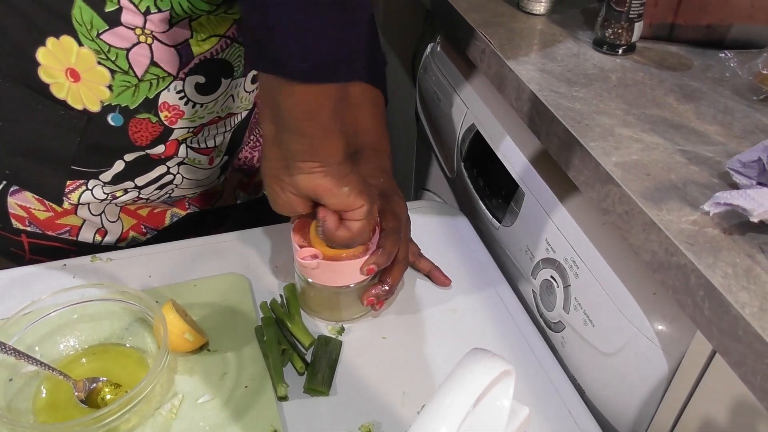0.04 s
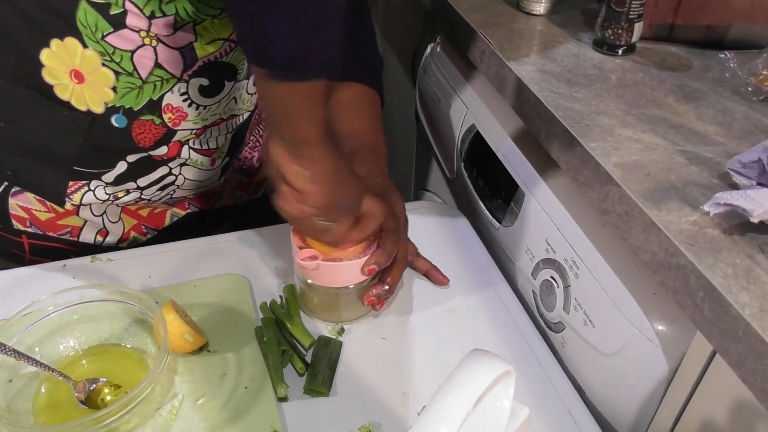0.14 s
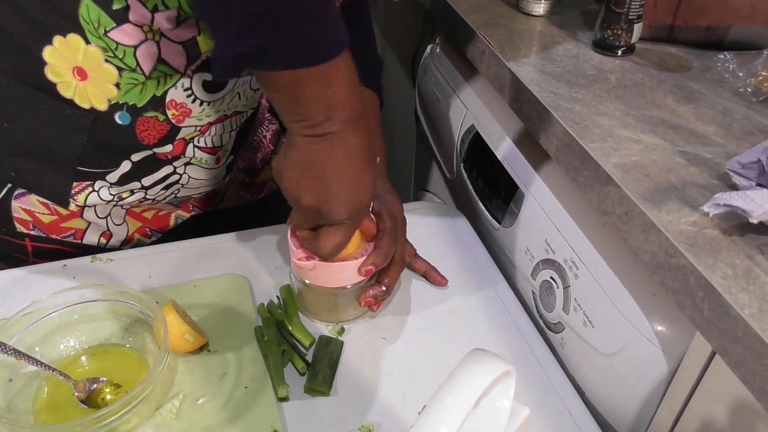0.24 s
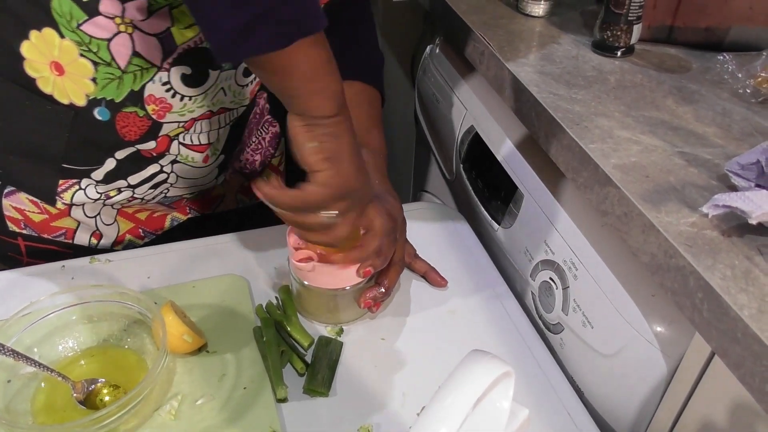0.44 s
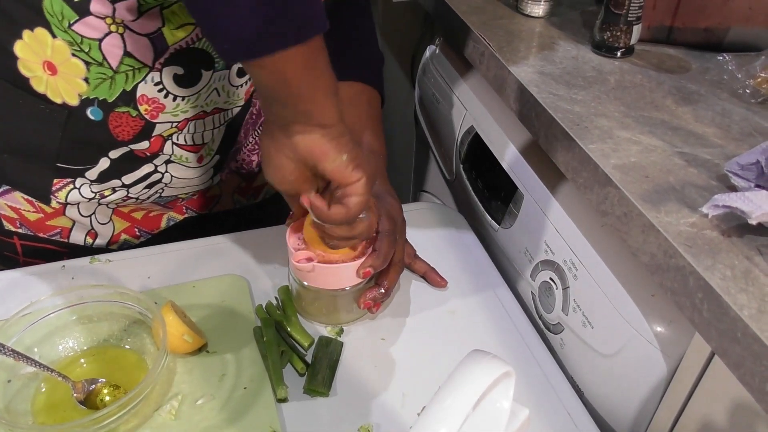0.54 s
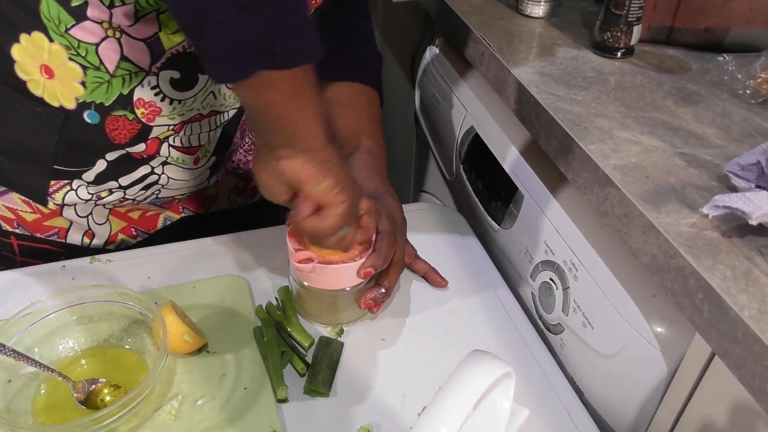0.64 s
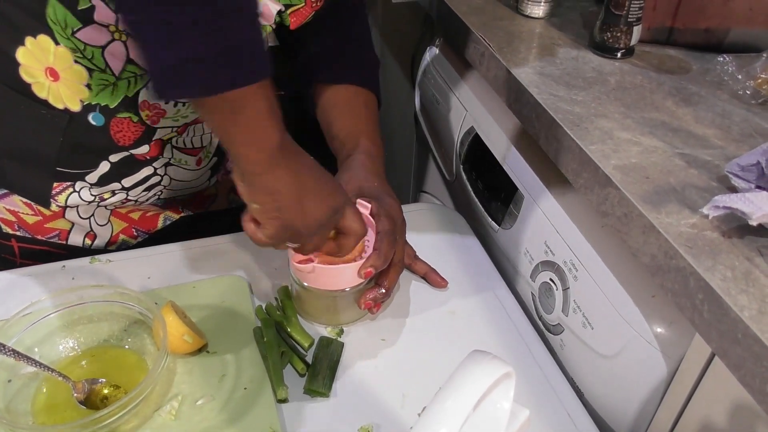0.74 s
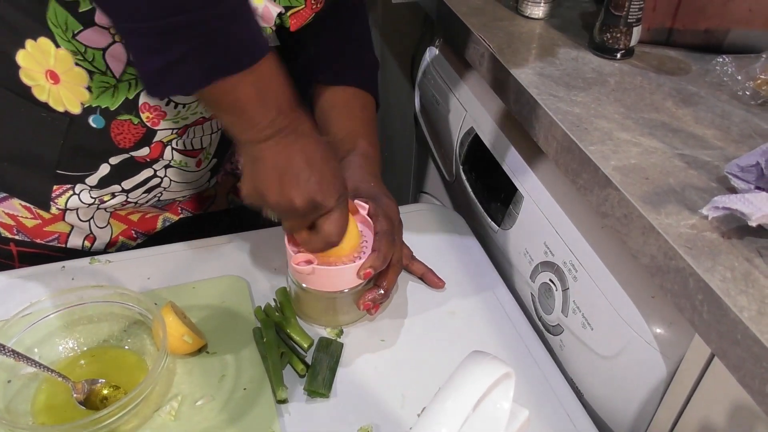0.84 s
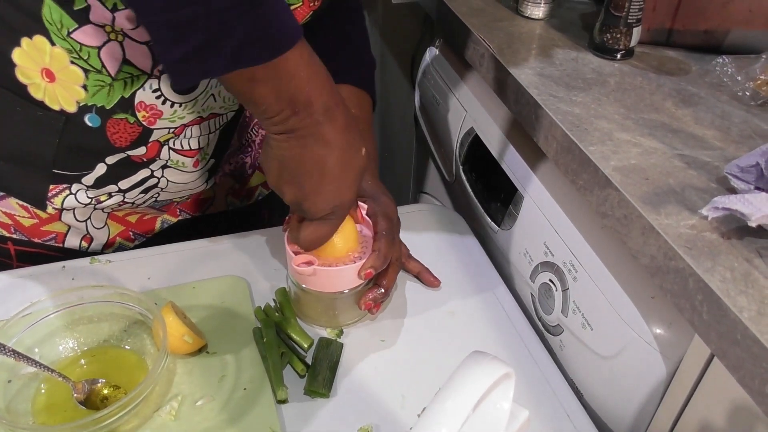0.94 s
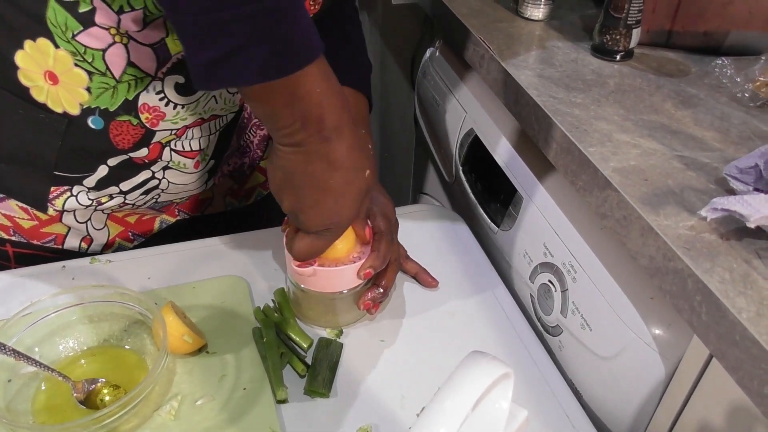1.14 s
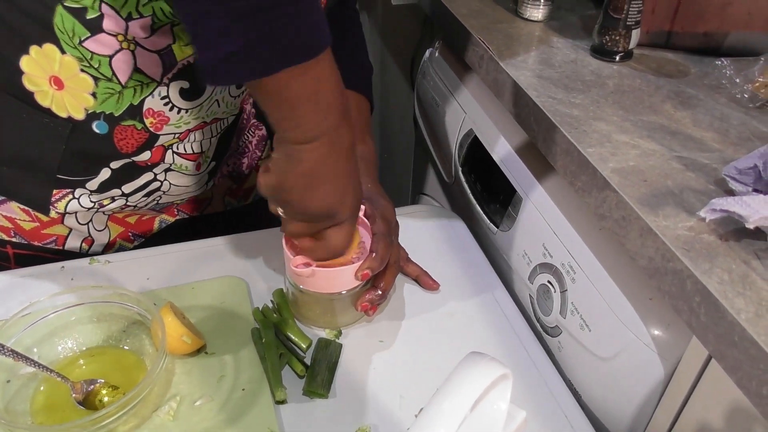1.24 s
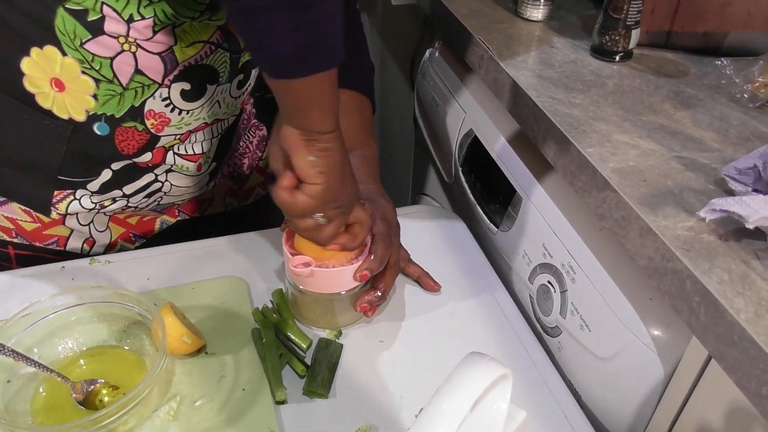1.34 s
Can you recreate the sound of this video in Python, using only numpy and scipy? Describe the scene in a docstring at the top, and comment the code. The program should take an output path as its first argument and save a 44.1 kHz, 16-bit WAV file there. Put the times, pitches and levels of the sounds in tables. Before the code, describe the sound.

A lemon half squelches on a plastic hand juicer, with one sharp crunching snap.

```python
"""A lemon half is pressed and twisted on a plastic hand juicer on a hollow metal appliance top.
Pulp crackles wetly from the start; the rubbing rind makes the top rumble. Near 0.25 s the rind groans,
the reamer slips and snaps twice against its cup, juice sprays and the cup knocks hard on the top.
Lighter knocks, pops and spurts follow; the cup rings near 0.85 s. From 1.25 s the rind groans again.
A small kitchen answers throughout."""
import sys
import numpy as np
from scipy import signal
from scipy.fft import rfft, irfft, next_fast_len
from scipy.io import wavfile
from scipy.ndimage import map_coordinates

SR = 44100
rng = np.random.default_rng(int(sys.argv[2]) if len(sys.argv) > 2 else 0)


def put_to_file(sound):
    """Save the sound as 16-bit audio at rate SR, in the file named by the first command-line argument."""
    columns = np.atleast_2d(sound).T  # one column per channel
    safe = np.clip(columns, -1, 1)
    whole_steps = np.round(safe * 32767)
    wavfile.write(sys.argv[1], SR, whole_steps.astype(np.int16))


N = 61739

# Noise in the top, rubbed or struck: freq_hz, gain_db
TOP_NOISE_SPECTRUM = [(25, -3), (45, -4), (72, -17), (100, -5.5), (122, 5.5), (150, -5.5), (195, 1.5),
                      (255, -5.5), (310, 0.5), (370, -15), (450, -0.5), (520, -9.5), (590, -10.5),
                      (720, -13), (1100, -36), (1800, -44), (4000, -58)]


def snaps(slips):
    """The reamer hits its cup, plastic on plastic: a wet crack and a short bright ring."""
    # freq_hz, level_db, base_t60_s
    reamer_modes = [(3320, -29, .05), (5650, -28, .012), (6380, -17, .01), (7080, -3, .012),
                    (7480, -11, .007), (8150, -8, .012), (9330, -15, .012), (11050, -17, .01),
                    (11950, -17, .01)]
    # freq_hz, gain_db
    crack_spectrum = [(500, -22), (1600, -19), (2400, -16), (4000, -14), (5100, -16), (6200, -7), (7200, 0),
                      (8500, -1), (10000, -8), (11700, -8), (13300, -19), (16000, -22)]
    rise_s, crack_base_t60_s = .00015, .009
    out, t = np.zeros(N), np.arange(SR // 10) / SR
    for start_s, level_db, pitch_ratio, t60_ratio in slips:
        crack = shaped(rng.standard_normal(len(t)), crack_spectrum)
        crack *= amp(-4 - 60 * t / (crack_base_t60_s * t60_ratio))
        modes = [(hz * pitch_ratio, db, t60_s * t60_ratio) for hz, db, t60_s in reamer_modes]
        attack = 1 - np.exp(-t / rise_s)
        add(out, start_s, amp(level_db - 4) * (ring(modes, t, scatter_db=1) + crack) * attack)
    return out


def knocks():
    """A square knock booms in the top; a rim knock rings the cup, damped by the grip."""
    # start_s, top_db, cup_db, cup_t60_ratio
    hits = [(.052, -37, -36, 1), (.064, -56, -35, 0.7), (0.1, -33.5, -46, 0.5), (0.222, -33.5, -52, 0.7),
            (0.24, -37, -46, 0.5), (.2585, -15, -18, 0.9), (.308, -29, -40, 0.7), (.383, -35.5, -55, .6),
            (.517, -37.5, -38, 0.87), (0.597, -39.5, -59, .6), (0.631, -39, -46, 0.8),
            (.7315, -63, -31, 0.36), (.765, -37.5, -48, 0.2), (0.822, -34.5, -52, .5),
            (.8462, -46, -22.5, 0.68), (0.868, -37, -28.5, 0.45), (.9066, -46, -31.5, 0.72),
            (1.129, -42, -41.5, 0.54), (1.165, -39.5, -61, 0.5), (1.284, -37, -41, 0.6),
            (1.339, -39, -46, 0.5), (1.39, -37.5, -56, .6)]
    # freq_hz, level_db, t60_s (cup ungripped)
    top_modes = [(43, -17, .28), (128, -6, .22), (170, -1, .1), (195, 2, .045), (240, -7, .035),
                 (325, -18, .1)]
    cup_modes = [(410, -3, .05), (454, -10, .12), (530, -3, .15), (600, -12, .035), (670, -9, .07),
                 (770, -12, .04), (1050, -24, .02)]
    # freq_hz, gain_db
    top_radiation = [(20, -18), (43, -4), (75, -13), (125, -3), (180, 1), (300, 0)]
    cup_radiation = [(100, -8.5), (400, -1.5)]
    out, t = np.zeros(N), np.arange(SR // 2) / SR
    for start_s, top_db, cup_db, cup_t60_ratio in hits:
        gripped = [(hz, db, t60_s * cup_t60_ratio) for hz, db, t60_s in cup_modes]
        cup = colour(struck(gripped, t, contact_s=.0011), lambda hz: along(cup_radiation, hz))
        top = colour(struck(top_modes, t, contact_s=.002), lambda hz: along(top_radiation, hz))
        add(out, start_s, amp(top_db - 4.5) * top + amp(cup_db - 4) * cup)
    return out


def struck(modes, t, contact_s, thud_t60_s=.06):
    """A body's ring and a dull thud, softened by the contact time."""
    push = np.sin(np.pi * np.minimum(t / contact_s, 1)) ** 2
    thud = amp(-14 - 60 * t / thud_t60_s) * shaped(rng.standard_normal(len(t)), TOP_NOISE_SPECTRUM)
    return signal.fftconvolve(ring(modes, t, scatter_db=2) + thud, push / push.sum())[:len(t)]


def ring(modes, t, scatter_db):
    """Damped modes start together; their levels vary per strike."""
    return sum(amp(db + scatter_db * rng.standard_normal() - 60 * t / t60_s) * np.sin(2 * np.pi * hz * t)
               for hz, db, t60_s in modes)


def pulp():
    """Pulp ground on the ribs: bright fizz and lower squelch, in clumps."""
    # One list per twist: time_s, fizz_db, squelch_db
    twists = [
        [(0.0, -37, -49), (0.026, -44.5, -60), (0.056, -49, -59.5), (0.098, -53, -61), (0.12, -57, -65.5),
         (0.145, -61.5, -60), (0.198, -38.5, -51), (0.215, -44, -50.5)],
        [(0.33, -56, -63), (0.348, -50.5, -60), (0.428, -50, -55.5), (0.566, -62, -67.5), (0.6, -56, -61),
         (0.628, -58, -65.5), (0.646, -52, -56), (0.7, -55, -64)],
        [(0.71, -52, -63), (0.756, -49.5, -56.5), (0.906, -53, -59.5), (1.028, -58.5, -68.5),
         (1.04, -55.5, -59.5), (1.088, -64.5, -73), (1.15, -56, -61.5), (1.19, -60, -76)],
        [(1.2, -63.5, -68), (1.238, -42.5, -53), (1.256, -57, -58), (1.264, -47.5, -66), (1.336, -38, -50),
         (1.354, -52, -62.5), (1.382, -40.5, -52), (1.39, -62, -64)],
    ]
    # freq_hz, gain_db
    fizz_spectrum = [(3000, -17.5), (5200, -10), (6300, -3), (7200, 0), (8600, -0.5), (10000, -6),
                     (11200, -8.5), (13000, -12.5), (16000, -22)]
    squelch_spectrum = [(600, 0.5), (1200, -8), (1600, -11), (2300, 0), (2900, -4), (3600, 1), (4400, -3),
                        (5200, -11.5), (8000, -13), (16000, -30)]
    fizz_db, squelch_db = curves(np.vstack(twists))
    clumps = wobble(120)
    fizz = amp(fizz_db - 5 + 2 * clumps) * crackle(fizz_spectrum, hiss_db=-7.5)
    squelch = amp(squelch_db + 1 + 3 * clumps) * crackle(squelch_spectrum, hiss_db=-6)
    return fizz + squelch


def crackle(spectrum, hiss_db, cells_per_s=2600, spread_db=5.5):
    """Tiny cells tear over a smooth wet hiss; rms 1."""
    sizes = amp(spread_db * np.minimum(rng.exponential(size=N), 3))
    cells = (rng.random(N) < cells_per_s / SR) * sizes * rng.choice([-1, 1], N)
    return shaped(unit(cells) + amp(hiss_db) * rng.standard_normal(N), spectrum)


def pops(t60_s=.012):
    """Larger juice cells and pips pop, each a brief wet tick."""
    # start_s, level_db, tilt_db_per_octave
    bursts = [(0.015, -47, 15), (0.052, -23, 2.5), (.066, -35, 18), (0.198, -41, 19), (0.2071, -23, 2),
              (0.2188, -27, 8), (0.388, -24.5, 0), (0.419, -24, 10), (0.4225, -25.5, 0), (0.449, -31, 15),
              (0.596, -33.5, 25), (0.65, -33.5, -4), (.743, -30, 16), (0.8248, -26.5, -10),
              (0.8471, -32.5, -6.5), (.849, -28, 33), (0.871, -33, 19), (0.908, -35.5, 1),
              (0.9755, -34.5, 29), (1.332, -27.5, -3), (1.381, -52, 13)]
    # freq_hz, gain_db
    spectrum = [(500, -25.5), (1600, -9.5), (2400, -1), (3800, -1), (5200, -9.5), (7200, 9), (8600, 4),
                (10000, -4.5), (11500, -10), (13500, -33), (16000, -57)]
    out, t = np.zeros(N), np.arange(SR // 20) / SR
    for start_s, level_db, tilt in bursts:
        burst = rng.standard_normal(len(t)) * amp(-60 * t / t60_s)
        tick = colour(burst, lambda hz: along(spectrum, hz) + tilt * np.log2(np.maximum(hz, 1000) / 6000))
        add(out, start_s, amp(level_db + 8) * tick / np.linalg.norm(tick))
    return out


def spurts(sharpness=9.5, rise_s=.00055):
    """A squirt of juice and air sounds the resonance of its pocket in the pulp."""
    # start_s, level_db, pocket_hz, length_s
    squirts = [(.296, -33.5, 7300, .007), (.296, -44, 2840, 0.0078), (.397, -44, 3180, 0.0056),
               (.419, -40.5, 2870, .007), (.637, -53, 2240, 0.0073), (.666, -52, 2260, .0084),
               (.7425, -45.5, 2320, 0.0035), (.761, -44, 2350, 0.0066), (.762, -47.5, 3800, 0.0062),
               (.813, -57, 2970, 0.0046), (.8245, -37, 2200, 0.001), (.8445, -39.5, 1460, 0.0026),
               (.916, -62, 2480, 0.013), (.898, -53, 3400, 0.0035), (.909, -45.5, 3580, 0.0034),
               (1.036, -62, 3800, 0.04), (1.248, -36, 7740, 0.0073)]
    out, t = np.zeros(N), np.arange(SR // 10) / SR
    for start_s, level_db, pocket_hz, length_s in squirts:
        noise = rng.standard_normal(len(t))
        jet = colour(noise, lambda hz: -20 * np.log10(1 + (sharpness * np.log((hz + 1) / pocket_hz)) ** 2))
        envelope = (1 - np.exp(-t / rise_s)) * np.exp(-(t / length_s) ** 2)
        add(out, start_s, amp(level_db) * unit(jet) * envelope)
    return out


def spray(slips, t60_s=.28):
    """Each snap flings out juice: a wet fizz that dies away."""
    # freq_hz, gain_db
    spectrum = [(1500, -26), (2600, -24), (3600, -9.5), (5100, -14), (6300, -6.5), (7300, 2.5),
                (8600, -11.5), (10000, -9), (12000, -33), (16000, -36)]
    out, t = np.zeros(N), np.arange(N) / SR
    for start_s, level_db, *_ in slips:
        add(out, start_s, amp(level_db - 32.5 - 60 * t / t60_s) * crackle(spectrum, hiss_db=-7.5))
    return out


def groans(jitter=.06, rough_db=3, overtone_db=-22, fade_s=.008):
    """The rind sticks and slips on the plastic: a rough note that rises as the twist tightens."""
    # One list per twist: time_s, pitch_hz, level_db
    twists = [
        [(.205, 426.3, -59), (.232, 428.5, -38.5), (.243, 450, -35.5), (.254, 486, -40)],
        [(1.255, 470.4, -68), (1.288, 455, -39), (1.315, 461, -56), (1.338, 487, -46), (1.375, 499.6, -58),
         (1.397, 504, -39)],
    ]
    out, t = np.zeros(N), np.arange(N) / SR
    for twist in twists:
        pitch_hz, level_db = curves(twist)
        phase = 2 * np.pi * np.cumsum(pitch_hz * (1 + jitter * wobble(250))) / SR
        tone = np.sin(phase) + amp(overtone_db) * np.sin(2 * phase)
        start_s, end_s = twist[0][0], twist[-1][0]
        gate = np.clip(1 + np.minimum(t - start_s, end_s - t) / fade_s, 0, 1)
        out += gate * amp(level_db) * unit(amp(rough_db * wobble(150)) * tone)
    return out


def rubbing():
    """The rind judders over the ribs and shakes the top."""
    # One list per stretch: time_s, level_db
    stretches = [
        [(0.01, -35.5), (0.112, -48), (0.144, -57), (0.178, -45.5), (0.196, -58), (0.214, -40), (0.27, -36)],
        [(0.35, -46), (0.47, -46.5), (0.564, -52.5), (0.655, -50), (0.715, -53), (0.765, -44), (0.8, -46.5)],
        [(0.93, -46), (1.0, -57.5), (1.1, -60.5), (1.135, -49), (1.22, -53.5), (1.276, -44), (1.39, -51.5)],
    ]
    level_db, = curves(np.vstack(stretches))
    judder = shaped(rng.standard_normal(N) * amp(1.13 * wobble(90)), TOP_NOISE_SPECTRUM)
    return amp(level_db + .5) * judder


def room(x, wet_db):
    """Direct sound plus the kitchen's tail."""
    # freq_hz, t60_s
    decay = [(150, 0.19), (1000, 0.33), (7000, 0.14), (15000, 0.1)]
    hz, t, noise = signal.stft(rng.standard_normal((2, SR // 2)), SR, nperseg=256)
    tail = signal.istft(noise * amp(-60 * t / along(decay, hz)[:, None]), SR, nperseg=256)[1]
    tail[:, :SR // 400] = 0  # 2.5 ms pre-delay
    wet = signal.fftconvolve(x[None], tail / np.linalg.norm(tail[0]), axes=1)[:, :N]
    return x + amp(wet_db) * stereo(*wet)


def room_noise(level_db=-54):
    """Quiet, steady, mostly low noise."""
    # freq_hz, gain_db
    spectrum = [(25, -5), (70, -7), (130, 4.5), (500, -0.5), (800, -5), (1200, -10.5), (1700, -23),
                (2500, -20.5), (4000, -21), (5300, -35), (7200, -19), (11000, -30.5), (16000, -29)]
    return amp(level_db) * stereo(*shaped(rng.standard_normal((2, N)), spectrum))


def stereo(mid, side):
    """Left and right; the stereo image is narrow at 2.5-6.5 kHz and wide above 10 kHz."""
    # freq_hz, gain_db
    side_spectrum = [(100, -14), (500, -9.5), (1100, -4), (2500, -13), (4500, -24), (6500, -31), (8500, -5),
                     (12000, 6), (16000, 0)]
    side = colour(side, lambda hz: along(side_spectrum, hz))
    return np.array([mid + side, mid - side])


def amp(db):
    """Decibels to gain."""
    return 10 ** (np.asarray(db) / 20)


def unit(x):
    """Scale to rms 1."""
    return x / np.sqrt(np.mean(x ** 2) + 1e-20)


def along(points, hz):
    """Interpolate (freq_hz, value) points on a log axis."""
    freq_hz, values = np.transpose(points)
    return np.interp(np.log(hz + 1), np.log(freq_hz + 1), values)


def curves(rows):
    """One value per sample for each column after time_s."""
    time_s, *columns = np.transpose(rows)
    return [np.interp(np.arange(N) / SR, time_s, column) for column in columns]


def wobble(knots_per_s):
    """Smooth random curve."""
    return map_coordinates(rng.standard_normal(4096), [np.arange(N) * knots_per_s / SR])


def colour(x, gain_db):
    """Minimum-phase filter with response gain_db(hz)."""
    size = 2 * next_fast_len(x.shape[-1])
    cepstrum = irfft(np.log(amp(gain_db(np.fft.rfftfreq(size, 1 / SR)))), size)
    cepstrum[1:size // 2] *= 2
    cepstrum[size // 2 + 1:] = 0
    return irfft(rfft(x, size) * np.exp(rfft(cepstrum)), size)[..., :x.shape[-1]]


def shaped(x, spectrum):
    """Filter by a spectrum table; rms 1."""
    return unit(colour(x, lambda hz: along(spectrum, hz)))


def add(track, start_s, sound):
    """Mix a sound into the track."""
    part = track[max(round(start_s * SR), 0):][:len(sound)]
    part += sound[:len(part)]


def scene():
    """Juicer straight ahead, the top's boom a little to the right, over room noise."""
    # Reamer slips, two contacts each: start_s, level_db, pitch_ratio, t60_ratio
    slips = [(.2295, -6, 1.08, .55), (.2307, -14, 1.14, .7), (.2602, -4.5, 1, 1), (.2616, -13, 1.1, .8)]
    right_minus_left_db = 4.5
    pan = amp(np.array([[-1], [1]]) * right_minus_left_db / 2)
    boom = room(knocks() + rubbing() + groans(), wet_db=-12) * pan
    background = room_noise()
    reamer = room(snaps(slips), wet_db=-13.5)
    juice = room(pops() + spurts() + spray(slips) + pulp(), wet_db=-7.5)
    return boom + background + reamer + juice


def record(dry, cutoff_hz=16200):
    """Brick-wall low-pass."""
    size = next_fast_len(N + SR // 2)
    passband = np.fft.rfftfreq(size, 1 / SR) < cutoff_hz
    return irfft(rfft(dry, size) * passband, size)[:, :N]


dry = scene()
out = record(dry)
put_to_file(out)
```